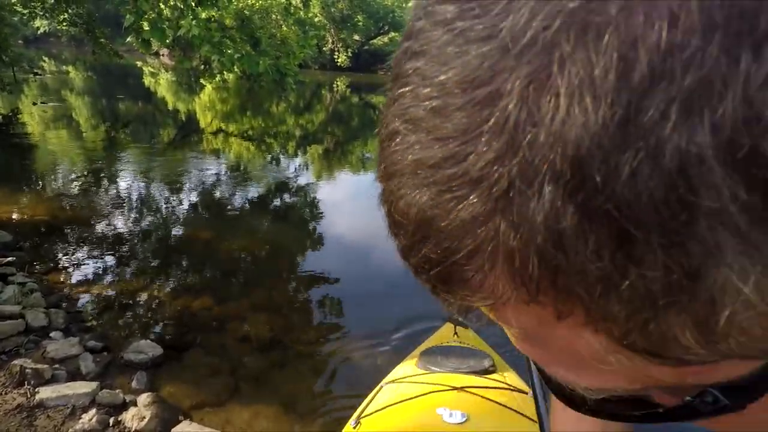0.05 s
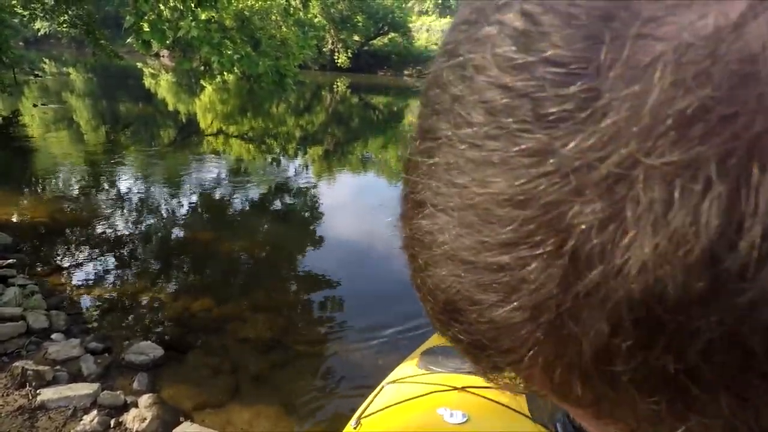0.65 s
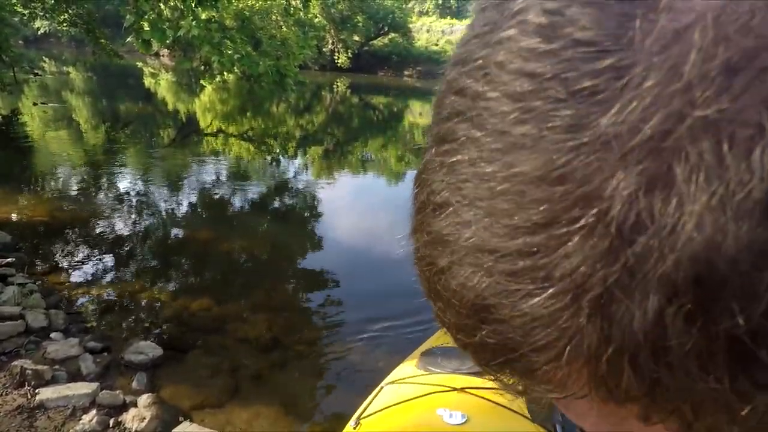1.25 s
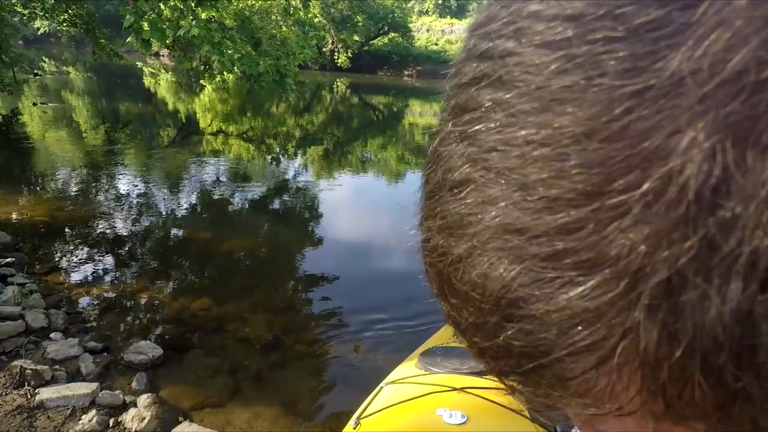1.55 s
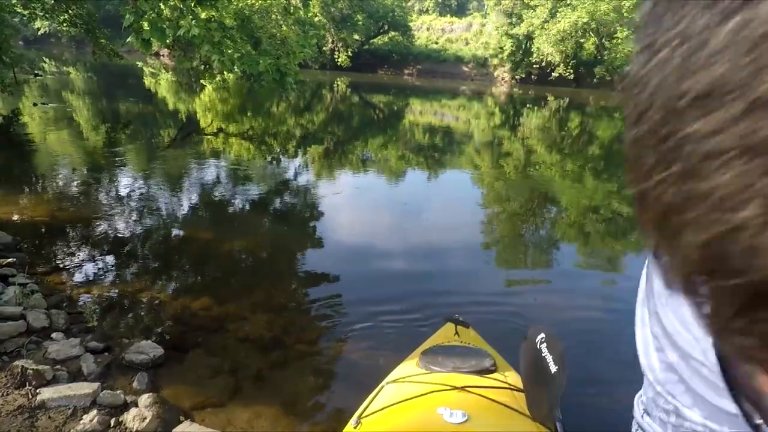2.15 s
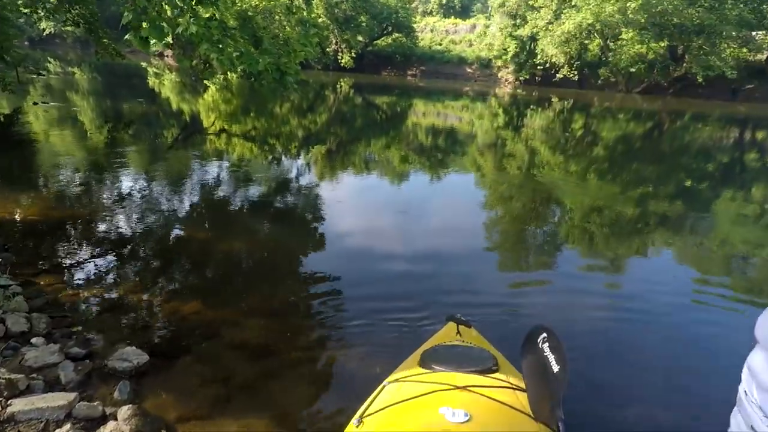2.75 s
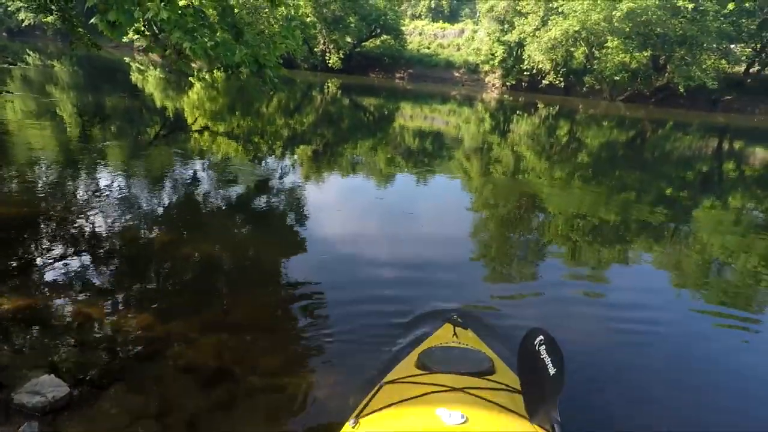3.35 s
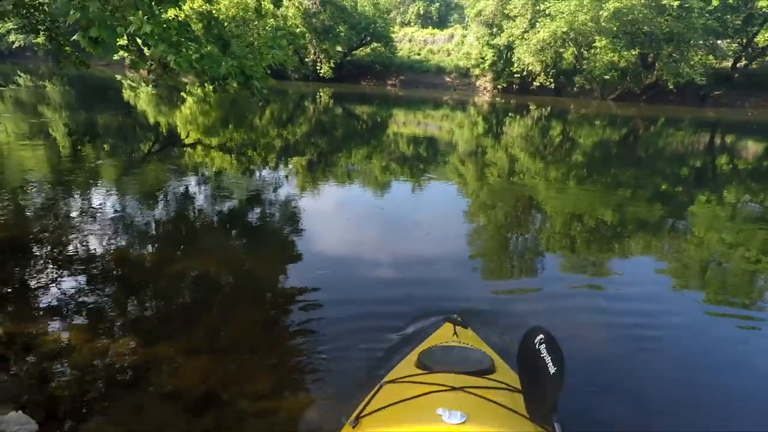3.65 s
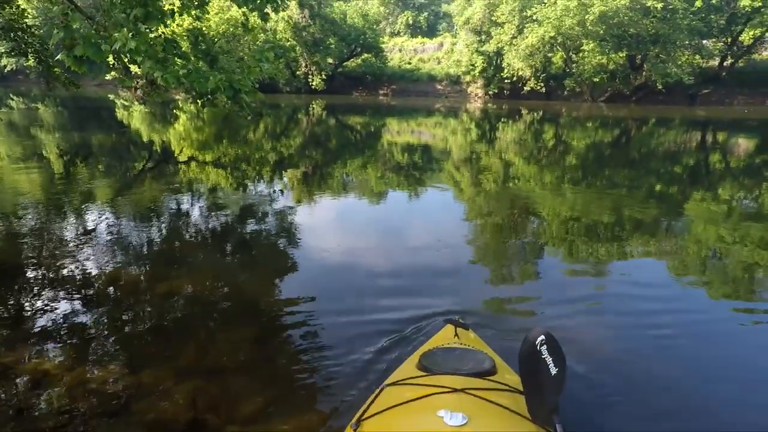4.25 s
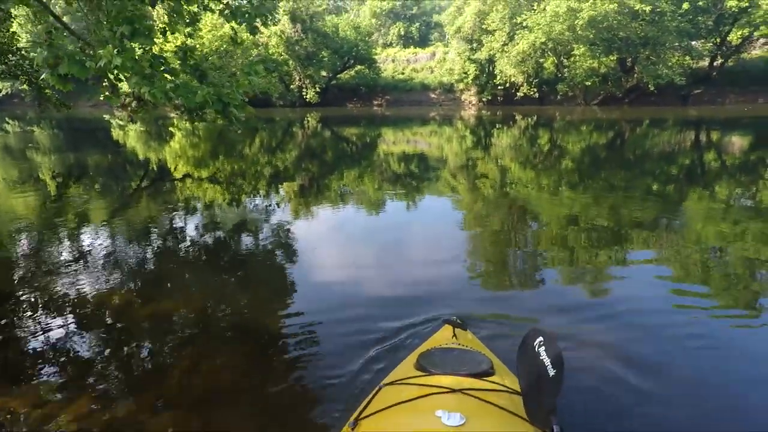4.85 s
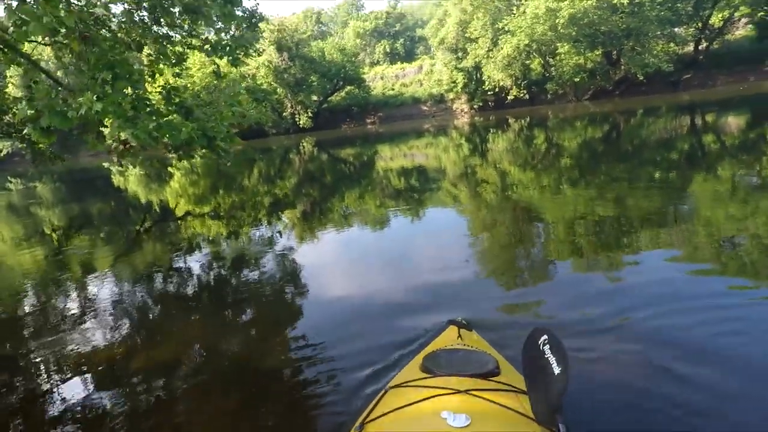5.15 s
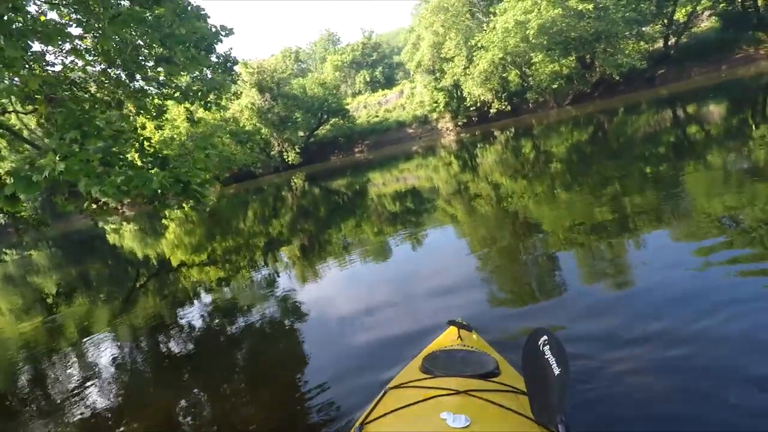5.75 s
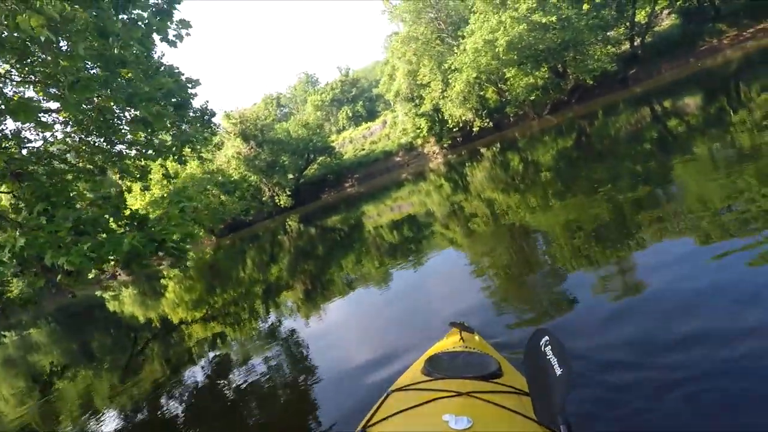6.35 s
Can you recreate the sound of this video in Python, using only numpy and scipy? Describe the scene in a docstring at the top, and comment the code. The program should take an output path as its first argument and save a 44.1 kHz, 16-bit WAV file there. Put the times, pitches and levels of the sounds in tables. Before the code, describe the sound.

A plastic kayak knocks and thumps on stones, then scrapes down a bank and rumbles out onto the water.

```python
"""Stony bank of a calm river. Camera microphone on the deck of a plastic kayak, heard through the hull.
Over faint air and hiss, a first shove sets the long hollow shell swaying in its lowest mode, as every
push will; the hull knocks, bumps and drags on the stones. A second volley follows near 1.8 s.
From 2.3 s the boat scrapes down the bank. Afloat by about 4 s, it takes a few more knocks,
two with a short crack, and rumbles out over the water, ending on a brief groan."""
import sys
import numpy as np
from scipy import signal
from scipy.fft import rfft, irfft
from scipy.io import wavfile

SR = 44100
rng = np.random.default_rng(int(sys.argv[2]) if len(sys.argv) > 2 else 0)


def store_wav(level_fs):
    """Save 16-bit WAV to argv[1]."""
    pcm = np.round(np.clip(np.atleast_2d(level_fs), -1, 1) * 32767)
    wavfile.write(sys.argv[1], SR, pcm.T.astype(np.int16))


N = 287091
TIME = np.arange(N) / SR
BINS = np.fft.rfftfreq(N, 1 / SR)


def amp(db):
    """Decibels to gain."""
    return 10 ** (np.asarray(db) / 20)


def unit_rms(x):
    """Scales to rms 1."""
    return x / np.sqrt(np.mean(x ** 2) + 1e-20)


def curves(rows):
    """Each column of a timed table, sample by sample."""
    times, *columns = np.transpose(rows)
    return [np.interp(TIME, times, column) for column in columns]


def add(mix, start, sound):
    """Mixes a sound in at start seconds."""
    part = mix[round(start * SR):][:len(sound)]
    part += sound[:len(part)]


def held(t, rise, hold, t60):
    """Attack, hold and release, at times t from the start."""
    return np.clip(t / rise, 0, 1) * amp(-60 * np.maximum(t - hold, 0) / t60)


def wander(rate_hz):
    """Random drift of rms 1, fading out above rate_hz."""
    return unit_rms(irfft(rfft(rng.standard_normal(N)) * np.exp(-(BINS / rate_hz) ** 2), N))


def coloured(x, spectrum, lift_db=0):
    """Gives x a spectrum, plus any lift by resonances; rms 1."""
    hz, db = np.transpose(spectrum)
    shape_db = np.interp(np.log(BINS + 1), np.log(hz + 1), db)
    return unit_rms(irfft(rfft(x) * amp(shape_db + lift_db), N))


def band(x, low_hz, high_hz):
    """Keeps one band, with steep edges; rms 1."""
    loss = np.sqrt((1 + (low_hz / (BINS + 1)) ** 20) * (1 + (BINS / high_hz) ** 20))
    return unit_rms(irfft(rfft(x) / loss, N))


def grit(per_s, spread_db):
    """Tiny slips of uneven size at random moments."""
    size = amp(spread_db * np.minimum(rng.exponential(1, N), 4))
    return size * rng.choice([-1, 1], N) * (rng.random(N) < per_s / SR)


# Open river air around the microphone: f/Hz, relative level/dB
AIR_SPECTRUM = [(60, -8.5), (150, -3), (300, -16), (700, -16.5), (2000, -33), (4000, -34), (8000, -44)]
# Thin hiss: f/Hz, relative level/dB
HISS_SPECTRUM = [(300, 6), (700, 5), (2000, 5.5), (4000, 3), (6000, -1.5), (10000, -7), (11000, -4),
                 (11800, -8), (14500, -13), (15600, -18)]
# Dips in the hiss: deepest at t/s, depth/dB, sinking time/s
DIPS = [(0.699, 16.5, 0.7), (2.17, 17.5, 0.23)]


def air_and_hiss(air_db=-66, hiss_db=-61.5, return_db_per_s=16):
    """Faint open air, and a hiss that sinks and creeps back around the two volleys of heavy knocks."""
    dip_db = sum(np.interp(TIME, [low - sink, low, low + depth / return_db_per_s], [0, depth, 0])
                 for low, depth, sink in DIPS)
    air = coloured(rng.standard_normal(N), AIR_SPECTRUM) * amp(air_db)
    hiss = coloured(rng.standard_normal(N), HISS_SPECTRUM) * amp(hiss_db - dip_db)
    return air + hiss


# Pushes that rock the shell, and the microphone with it: t/s, level/dB, hold/s
SHELL_PUSHES = [(0.0, -18.5, 0.3), (0.28, -9, 0.063), (0.47, -11, 0.04), (0.64, -23.5, 0.11),
                (0.941, -34, 0.12), (1.06, -28, 0.15), (1.78, -10, 0.12), (2.23, -24, 0.24),
                (3.1, -18.5, 0.15), (3.6, -22.5, 0.063), (4.13, -16, 0.25), (4.98, -23, 0.35),
                (5.47, -15, 0.34)]


def shell_sway(mode_hz=48.56, rest_db=-39, slide_db=-5, uneven_db=4, restless_db=1):
    """The whole shell rings at one low pitch after each push, less steadily while the slide shakes it."""
    rumble_level, _ = curves(SLIDE_LEVELS)
    afloat, = curves(WEIGHT_AFLOAT)
    push_power = sum((amp(db) * held(TIME - start, rise=0.02, hold=hold, t60=0.55)) ** 2
                     for start, db, hold in SHELL_PUSHES)
    shaking = amp(rumble_level + slide_db + uneven_db * wander(7))
    swing = np.sqrt(push_power + shaking ** 2 + amp(rest_db) ** 2)
    hz = mode_hz * (1 + (0.017 + 0.09 * afloat) * wander(13))  # the pitch wavers more once afloat
    tone = np.sqrt(2) * np.sin(2 * np.pi * np.cumsum(hz) / SR)
    return amp(restless_db * wander(2.7)) * swing * tone


# Resonances of deck and camera mount, right at the microphone: f/Hz, width/Hz, lift/dB
DECK_RESONANCES = [(296, 26, 3.5), (495, 76, 3), (748, 77, 6.5), (955, 72, 2), (1688, 160, 4),
                   (2033, 160, 6), (2480, 53, 3.5), (2760, 95, 5), (3257, 150, 5.5), (4530, 550, 1.5)]


def hull_colour(ripple_db=3, spacing_hz=30, dense_hz=700):
    """Lift in dB on the way through the hull: deck resonances and a ripple of countless upper modes."""
    deck_db = sum(db / (1 + (2 * (BINS - hz) / width) ** 2) for hz, width, db in DECK_RESONANCES)
    knots = rng.standard_normal(8000)
    ripple = np.interp(BINS / spacing_hz, np.arange(len(knots)), knots)
    return deck_db + ripple_db * ripple * BINS / (BINS + dense_hz)


# Stones striking the hull, within a boat's length of the microphone:
# t/s, thud level/dB, clack level/dB, sharpness/dB, factor on the decay time
STONE_CONTACTS = [(0.021, -6.5, -34, 6.5, 1.17), (0.261, -11, -34.5, 1.5, 1.5),
                  (0.295, -1.5, -13.5, -15, 0.95), (0.319, -2.5, -20.5, -1, 0.78),
                  (0.342, -13, -42.5, 15, 2.2), (0.364, -17.5, -24, -18, 0.79), (0.413, -27, -37, 1, 2.2),
                  (0.456, -18.5, -23, -37, 0.76), (0.487, -14, -34, -12, 1.96), (0.510, -9, -30.5, 4, 1.4),
                  (0.546, -11, -27, -31, 0.67), (1.06, -30, -65, 20.5, 2.06),
                  (1.254, -31.5, -42.5, 19, 1.18), (1.333, -34.5, -66.5, 20, 1.2),
                  (1.566, -41, -57, 12, 3.2), (1.632, -35.5, -47.5, 8, 1.5), (1.652, -28, -42.5, 12, 1.34),
                  (1.74, -30.5, -23.5, 0, 0.79), (1.775, -2, -13.5, 2.5, 0.95), (1.802, -3, -17, 12, 0.69),
                  (1.823, -3, -27, 7, 0.75), (1.864, -26.5, -45, 18.5, 1.5), (1.913, -22, -30.5, 10, 0.85),
                  (1.961, -17.5, -34, 0, 1.63), (1.994, -20, -31.5, 12, 0.78), (2.019, -36, -37, 4, 1.3),
                  (2.04, -34, -36.5, 9.5, 1.57), (2.233, -25, -57.5, 20.5, 1.5), (2.291, -34, -48, 8, 0.42),
                  (2.333, -31, -48.5, 8, 0.84), (4.458, -24.5, -44, -12, 0.41),
                  (4.6084, -11, -13.5, -0.5, 0.8), (5.031, -17.5, -29, -2, 0.61)]
# Low panel modes of the hull: f/Hz, relative level/dB, t60/s
PANEL_MODES = [(70.4, 0.5, 0.39), (108.9, 7, 0.36), (156.3, 4, 0.097), (182.3, 2.5, 0.2),
               (244.6, -11.5, 0.14), (308, -14, 0.22), (314, -22, 0.44), (487, -36.5, 0.081)]
# Dense upper modes of the hull: f/Hz, relative level/dB
CLACK_SPECTRUM = [(230, 0.5), (350, -4), (520, -13), (680, -25.5), (950, -7.5), (1280, -14.5), (1750, -14),
                  (2100, -18.5), (2500, -29), (3300, -35.5), (4000, -45), (6000, -50), (9000, -57.5),
                  (15000, -66.5)]
# Knock, clack, edge and tick ranges of those modes: low f/Hz, high f/Hz, t60/s, gain/dB
CLACK_RANGES = [(206, 706, 0.15, -0.5), (875, 1790, 0.07, 0), (2260, 2600, 0.09, 2), (3300, 18000, .07, -1)]


def stone_knocks(hull_db, clack_rise_s=0.0016, thud_rise_s=0.0041, gritty_db=2, deck_db=-1):
    """Each contact rings the low panel modes, the deck and a quickly dying cloud of higher modes."""
    t, out = np.arange(SR // 2) / SR, np.zeros(N)
    deck = sum(2 * np.sqrt(width / SR) * np.sin(2 * np.pi * hz * TIME)
               for hz, width, _ in DECK_RESONANCES)
    crunch = rng.standard_normal(N) * amp(gritty_db * wander(170))
    cloud = coloured(crunch + amp(deck_db) * deck, CLACK_SPECTRUM, hull_db)
    ranges = [(amp(db) * band(cloud, low, high), t60) for low, high, t60, db in CLACK_RANGES]
    for start, thud_db, clack_db, sharp_db, ring in STONE_CONTACTS:
        # the place of contact decides how strongly each panel answers
        shares = (0.11 + rng.random(len(PANEL_MODES))) * amp([db for _, db, _ in PANEL_MODES])
        shares *= np.sqrt(2) / np.linalg.norm(shares) * (-1) ** np.arange(len(PANEL_MODES))
        panels = sum(share * amp(-60 * t / (t60 * ring)) * np.sin(2 * np.pi * hz * t)
                     for (hz, _, t60), share in zip(PANEL_MODES, shares))
        add(out, start, amp(thud_db) * panels * (1 - np.exp(-t / thud_rise_s)))
        knock_db = clack_db + 0.59 * (thud_db - clack_db) + 2  # just above a blend of thud and clack
        edge_db = clack_db - 15.5 + 0.45 * sharp_db  # a sharp stone lifts the edge in part
        tick_db = clack_db - 22 + sharp_db  # and the tick fully
        offset = int(rng.random() * (N - len(t)))
        for (modes, t60), db in zip(ranges, (knock_db, clack_db, edge_db, tick_db)):
            envelope = amp(db - 60 * t / (t60 * ring)) * (1 - np.exp(-t / clack_rise_s))
            add(out, start, modes[offset:][:len(t)] * envelope)
    return out


# Soft bumps on the hull below the microphone: t/s, relative peak level/dB, f/Hz, swell time/s
SOFT_BUMPS = [(0.022, -15, 527, 0.005), (0.039, -5.5, 146.3, 0.018), (0.298, -5.5, 107.7, 0.022),
              (0.506, -7, 135.3, 0.014), (0.574, -16.5, 150.5, 0.019), (1.054, -23.5, 124, 0.016),
              (1.271, -29, 238, 0.011), (1.275, -37.5, 302, 0.017), (1.639, -24.5, 162, 0.021),
              (1.778, 1.5, 113, 0.018), (1.782, -13.5, 328.3, 0.019), (1.972, -13.5, 154, 0.0056),
              (2.237, -17, 178, .007), (2.36, -17, 129, 0.0064), (2.531, -16.5, 131.5, 0.008),
              (3.047, -12.5, 120.5, 0.0079), (3.276, -17.5, 175, 0.01), (3.444, -9.5, 180.6, 0.02),
              (4.128, 0, 112.6, 0.018), (4.51, -13.5, 136, 0.016), (4.609, 2, 105, 0.0052),
              (4.619, -3.5, 148.7, 0.016)]


def panel_bumps(gain_db=-1):
    """A soft push flexes one panel; its tone swells and dies within a few cycles."""
    t, out = np.arange(SR // 3) / SR, np.zeros(N)
    for start, db, hz, swell in SOFT_BUMPS:
        envelope = (t / swell * np.exp(1 - t / swell)) ** 1.44
        add(out, start, amp(db + gain_db) * envelope * np.sin(2 * np.pi * hz * t))
    return out


# Short drags on the bank between the knocks: t/s, length/s, level/dB, treble tilt/(dB per octave)
SHORT_DRAGS = [(0.026, 0.022, -28, 0), (0.303, 0.23, -39.5, 3.5), (0.556, 0.052, -48, -1.5),
               (1.768, 0.063, -22.5, -4), (1.837, 0.26, -45.5, 2), (2.237, 0.17, -53, 6)]
# Low rumble of the moving hull, as it reaches the deck: f/Hz, relative level/dB
RUMBLE_SPECTRUM = [(35, -32.5), (52, 1), (68, -4.5), (85, -4), (115, -0.5), (150, 5), (185, -3), (225, -11),
                   (290, -11), (370, -13), (440, -22), (520, -26.5), (680, -50.5), (1200, -77.5)]


def stone_drags(hull_db, body_db=6, judder_db=3, tilt_from_hz=1800):
    """The hull judders over stones for a moment; the slips ring its upper modes and shake its panels."""
    slips = grit(per_s=2500, spread_db=7.5) * amp(judder_db * wander(84))
    octaves = np.log2(np.maximum(BINS / tilt_from_hz, 1))
    body = amp(body_db) * coloured(slips, RUMBLE_SPECTRUM, hull_db)
    out = np.zeros(N)
    for start, length, db, tilt in SHORT_DRAGS:
        rasp = coloured(slips, CLACK_SPECTRUM, hull_db + tilt * octaves)
        out += amp(db) * held(TIME - start, rise=0.008, hold=length, t60=0.069) * (body + rasp)
    return out


# From bank to river, the microphone riding along: t/s, rumble level/dB, scrape level/dB
SLIDE_LEVELS = [(2.3, -69, -61), (2.44, -44, -62), (2.59, -37.5, -45), (2.79, -31.5, -36.5),
                (3.11, -30, -29.5), (3.44, -20.5, -32), (3.6, -25, -35), (3.78, -25.5, -40),
                (4.1, -32.5, -48.5), (4.5, -32, -44.5), (4.92, -23, -34.5), (5.25, -23, -38),
                (5.92, -19.5, -37), (6.12, -24.5, -40), (6.51, -23, -37.5)]
# The river takes the boat: t/s, share of the weight on the water
WEIGHT_AFLOAT = [(2.3, 0.051), (3.4, 0.092), (4.1, 0.99), (4.7, 1), (6.51, 1)]
# Hull scraping on the bank: f/Hz, relative level/dB
GRAVEL_SPECTRUM = [(200, -7), (300, 10.5), (420, 0.5), (540, 4), (680, -10), (950, 2), (1300, -2),
                   (2000, -3), (2450, -14.5), (3300, -19), (3900, -29.5), (5000, -34), (7000, -49),
                   (12000, -64)]
# Hull moving out from the bank: f/Hz, relative level/dB
GLIDE_SPECTRUM = [(300, 2.5), (500, 7), (680, -10), (930, 2), (1280, -8), (1700, -2.5), (2030, -8),
                  (2450, -16.5), (3250, -26.5), (3700, -35), (5000, -37), (8000, -57)]


def bank_slide(hull_db, rumble_db=3, scrape_db=2, lumpy_db=3, flicker_db=1):
    """Grit slips under the rumbling hull; the scrape turns to a glide as the water takes the weight."""
    rumble_level, scrape_level = curves(SLIDE_LEVELS)
    afloat, = curves(WEIGHT_AFLOAT)
    moving = np.clip((TIME - 2.22) / 0.068, 0, 1)
    rumble = coloured(grit(per_s=1500, spread_db=2.43), RUMBLE_SPECTRUM, hull_db)
    rumble *= amp(rumble_level + rumble_db + lumpy_db * wander(11))
    gravel = coloured(grit(per_s=3000, spread_db=0.44), GRAVEL_SPECTRUM, hull_db)
    glide = coloured(grit(per_s=6000, spread_db=2.6), GLIDE_SPECTRUM, hull_db)
    scrape = gravel * np.sqrt(1 - afloat) + glide * np.sqrt(afloat)
    scrape *= amp(scrape_level + scrape_db + flicker_db * wander(20))
    return moving * (rumble + scrape)


# Narrow-band sounds of the shell: two short knock cracks, longer groans and rasps, a faint rising
# whistle: centre t/s, level/dB, f/Hz, width/Hz, length/s, glide/(Hz per s)
CRACKS_AND_GROANS = [(3.61, -62, 4570, 500, 0.052, -3), (4.13, -75, 3830, 50, 0.77, 1202),
                     (4.459, -36, 960, 40, 0.012, 11), (4.613, -17.5, 1990, 260, 0.01, 0),
                     (4.88, -61, 3200, 130, .5, 0), (6.47, -28, 503, 45.5, 0.15, 2)]


def cracks_and_groans():
    """One resonance of the shell sounds for a moment: a narrow band of noise swells and fades."""
    out = np.zeros(N)
    for centre, db, hz, width, length, glide in CRACKS_AND_GROANS:
        t = TIME - centre
        phase = 2 * np.pi * (hz * t + glide * t ** 2 / 2)
        rough_tone = wander(width) * np.cos(phase) + wander(width) * np.sin(phase)
        out += amp(db) * rough_tone * np.exp(-(2 * t / length) ** 2)
    return out


def scene():
    """All that reaches the microphone on the deck, in one channel."""
    hull_db = hull_colour()
    shoves = stone_knocks(hull_db) + stone_drags(hull_db) + panel_bumps() + shell_sway()
    return (shoves + bank_slide(hull_db) + cracks_and_groans() + air_and_hiss())[None]


def record(dry):
    """This close, the hardest knocks overload the camera's recorder; its treble ends at 15.6 kHz."""
    clipped = dry / (1 + np.abs(dry) ** 30) ** (1 / 30)
    faded = clipped * signal.windows.tukey(N, 0.002)
    lowpass = signal.firwin(511, 15600, window=("kaiser", 9), fs=SR)
    return signal.oaconvolve(faded, lowpass[None], "same")


dry = scene()
out = record(dry)
store_wav(out)
```